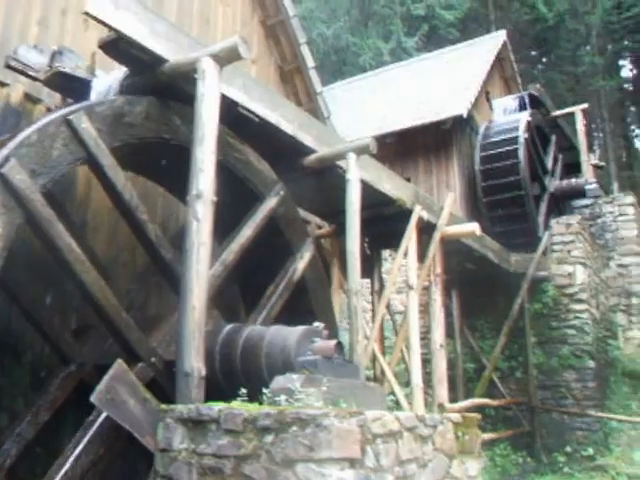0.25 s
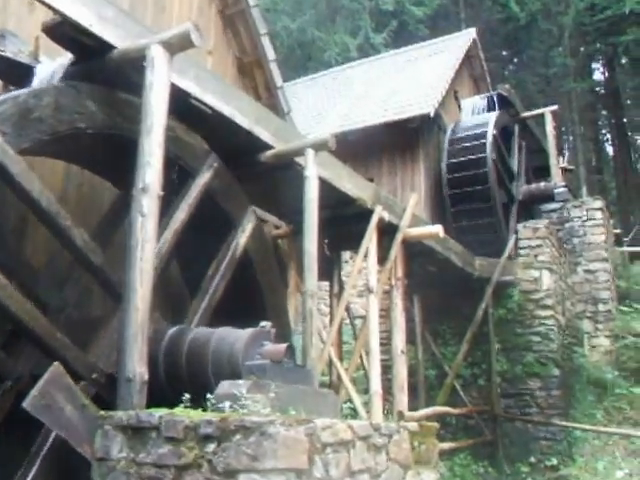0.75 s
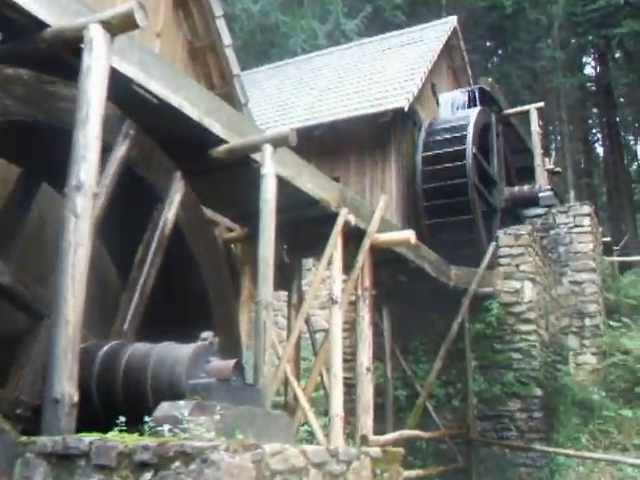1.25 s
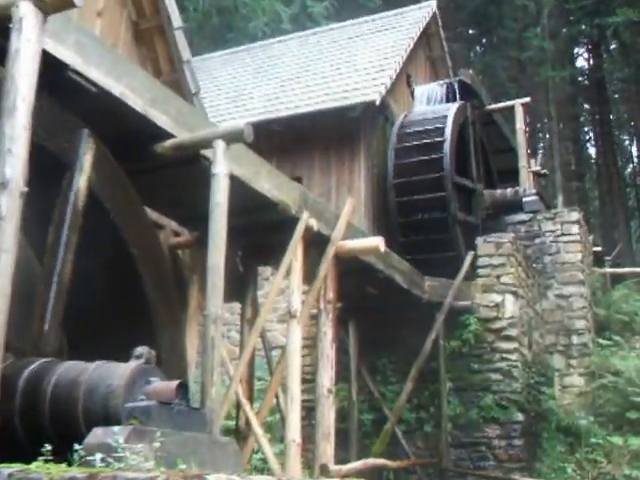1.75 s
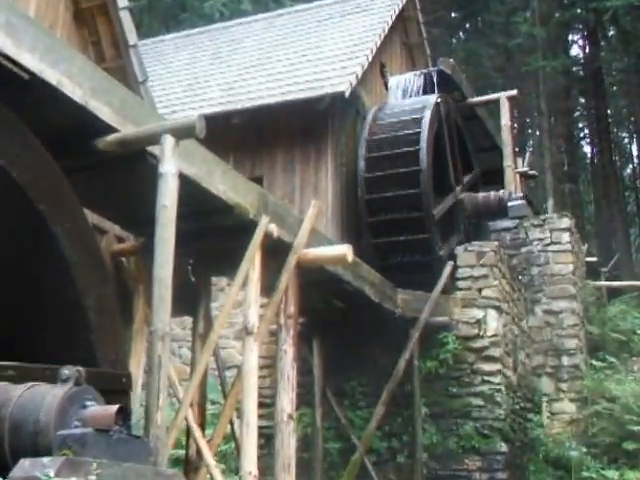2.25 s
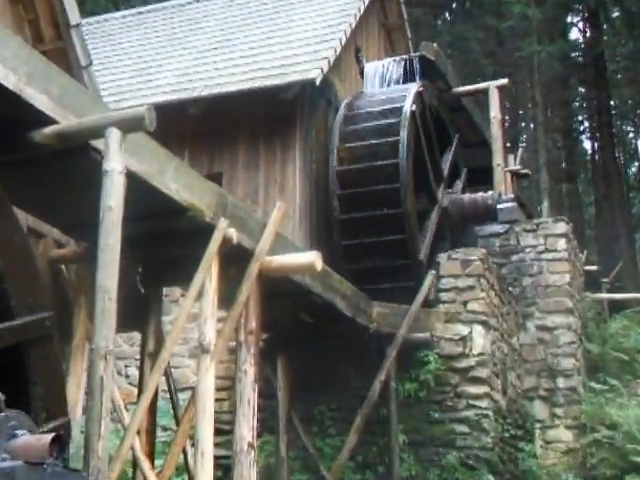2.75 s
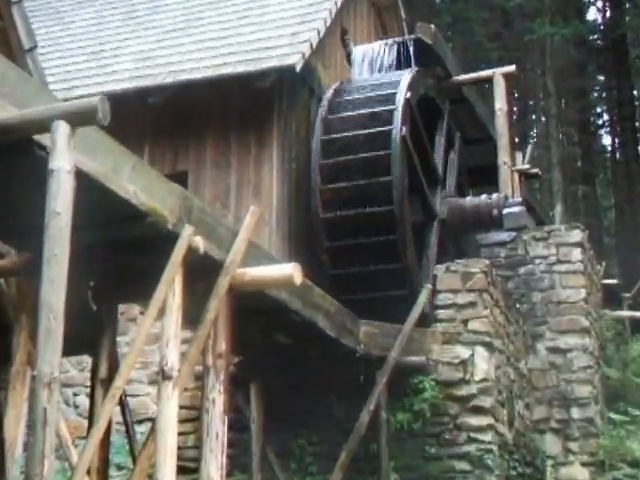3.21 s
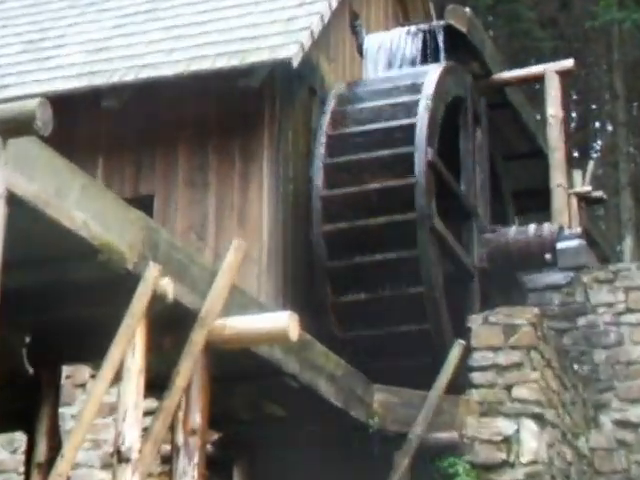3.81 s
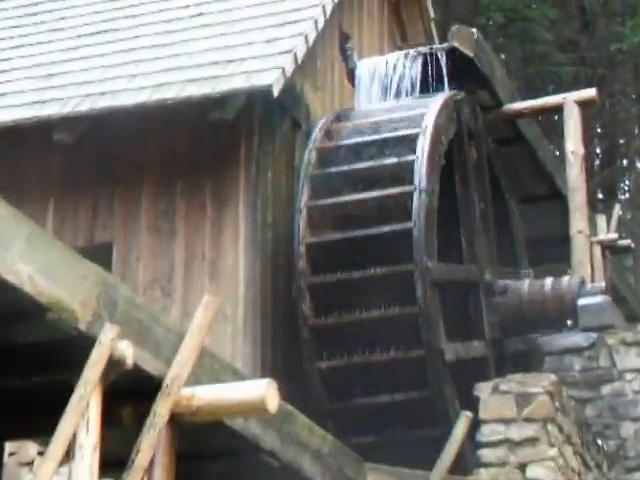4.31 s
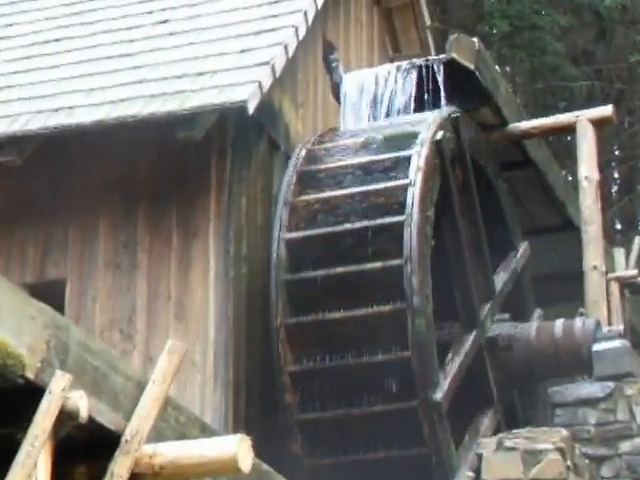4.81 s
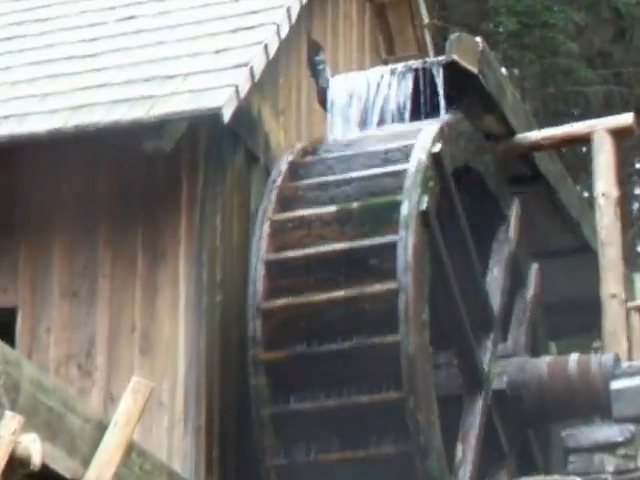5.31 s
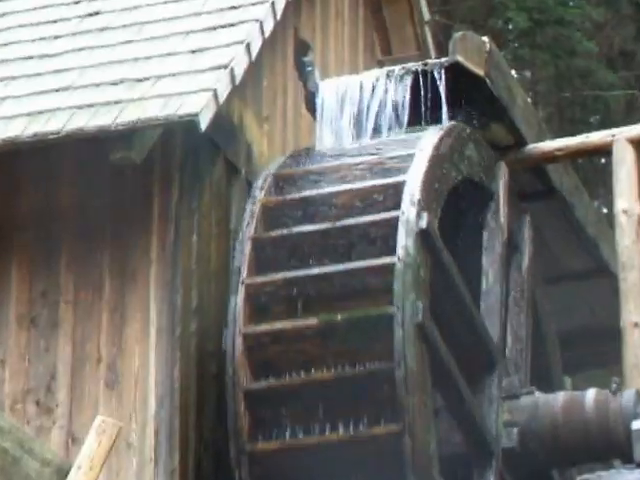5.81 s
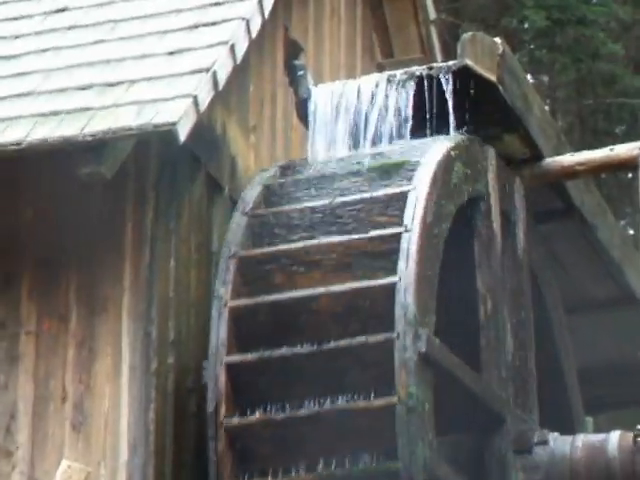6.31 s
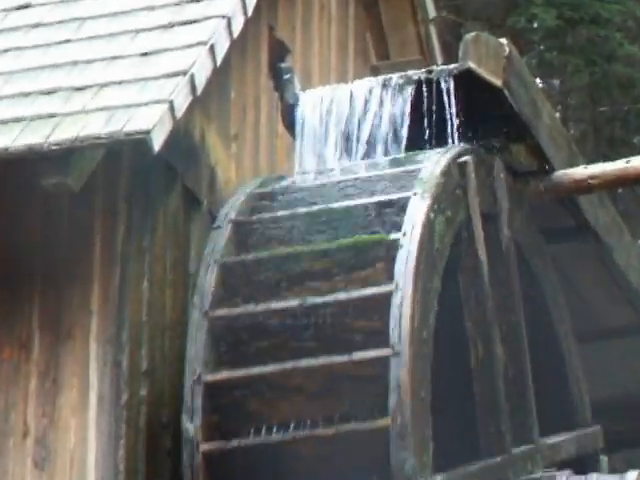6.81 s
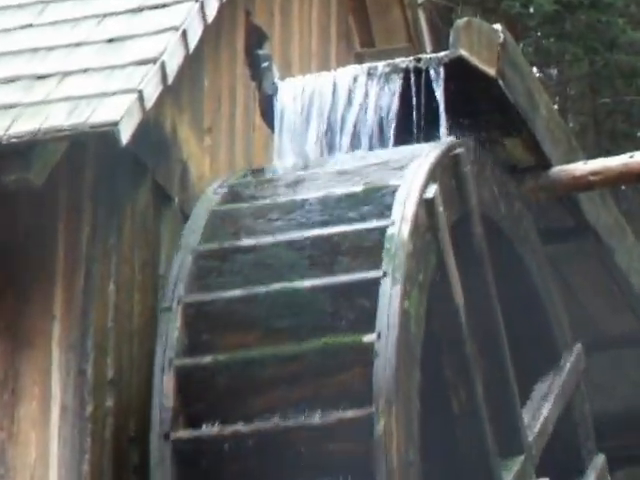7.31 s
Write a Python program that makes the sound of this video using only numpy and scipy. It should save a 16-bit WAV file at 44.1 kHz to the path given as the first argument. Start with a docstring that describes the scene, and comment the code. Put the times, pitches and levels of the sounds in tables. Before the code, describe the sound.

At an outdoor mill, falling water splashes continuously over a wooden wheel, pulsing about four times a second with churning and occasional plops underneath. Wooden stamps soon join in, dropping and bouncing with short rattling knocks that boom lightly through the timber frame. Water and knocking carry on together to the end, heard in mono through a camera microphone with a soft top and light low end.

```python
"""Water pours from a flume onto a turning wooden wheel. From the start a bright spray hisses over a
duller churn and a low gurgle, swelling as the buckets pass, and a few big bubbles plop.
From about 2 s wooden mill stamps drop and chatter behind the wall, booming in the frame: three stamps
take over from one another while the water runs on to the end.
All is heard through a mono camera microphone with little bass and a soft treble edge."""
import sys
import numpy as np
from scipy import signal
from scipy.fft import rfft, irfft, next_fast_len
from scipy.io import wavfile
from scipy.ndimage import uniform_filter1d, map_coordinates

SR = 44100
rng = np.random.default_rng(int(sys.argv[2]) if len(sys.argv) > 2 else 0)


def wav_out(sig):
    """Save sig, one row per channel (or a flat mono array), as 16-bit PCM at SR to the path in sys.argv[1]."""
    wavfile.write(sys.argv[1], SR, np.round(np.clip(np.atleast_2d(sig).T, -1, 1) * 32767).astype(np.int16))


N = 332955


def amp(db):
    """Gain of a level in dB."""
    return 10 ** (np.asarray(db) / 20)


def unit(x):
    """x at rms 1."""
    return x / np.sqrt(np.mean(x ** 2) + 1e-20)


def along(points, hz):
    """Read a curve of (Hz, value) points on a log frequency axis."""
    f, v = np.transpose(points)
    return np.interp(np.log(hz + 1), np.log(f + 1), v)


def filtered(x, response):
    """x through an EQ whose gain is a function of frequency."""
    m = next_fast_len(len(x) + 8192)
    return irfft(rfft(x, m) * response(np.fft.rfftfreq(m, 1 / SR)), m)[:len(x)]


def coloured(x, spectrum):
    """x shaped by (Hz, dB) points, at rms 1."""
    return unit(filtered(x, lambda hz: amp(along(spectrum, hz))))


def wobble(rate):
    """A smooth random curve, rate knots a second."""
    return map_coordinates(rng.standard_normal(int(N * rate / SR) + 4), [np.arange(N) * rate / SR])


def patchy(depth_db):
    """White noise with patches of random gain across time and frequency."""
    z = signal.stft(rng.standard_normal(N), nperseg=512)[2]
    field = uniform_filter1d(rng.standard_normal(z.shape), size=6, axis=0)
    field = uniform_filter1d(field, size=8, axis=1)
    return signal.istft(z * amp(depth_db * unit(field)), nperseg=512)[1][:N]


def drops(count, hz, cycles, spread_db, rise):
    """Damped sines at random times, scattered around hz; a bubble's pitch rises as it dies."""
    starts = (rng.random((count, 1)) * N).astype(int)
    scatter = np.clip(rng.standard_normal((count, 2)), -2.5, 2.5)
    k = np.arange(400)
    turns = np.clip(hz * np.exp(0.338 * scatter[:, :1]), 300, 9000) * k / SR
    envelope = (1 - np.exp(-2 * turns)) * np.exp(-turns / cycles) * (1 - k / 400)
    tone = np.sin(2 * np.pi * turns * (1 + rise * turns / cycles))
    pings = amp(spread_db * scatter[:, 1:]) * envelope * tone
    return unit(np.bincount((starts + k).ravel(), pings.ravel(), N + 400)[:N])


# The water bed between swells. Each row: time in seconds, spray fader in dB, churn fader in dB.
WATER_FADERS = [(0, -27.5, -32.5), (.6, -28.5, -34.5), (1.0, -29, -36), (1.2, -31, -37), (1.7, -31, -35.5),
                (2.15, -30.5, -34.5), (2.3, -27.5, -36), (2.9, -29, -29), (3.3, -31.5, -37.5),
                (3.62, -32.5, -38.5), (3.95, -28, -34), (4.4, -30.5, -38), (4.9, -28, -35),
                (5.4, -31, -36.5), (5.7, -31.5, -39.5), (6.4, -33, -40), (7.0, -32, -40),
                (7.55, -32, -37.5)]


def water():
    """The pour on the wheel: spray and churn ride the swells and share one fast flutter."""
    times, *faders = np.transpose(WATER_FADERS)
    spray_db, churn_db = [np.interp(np.arange(N) / SR, times, fader) for fader in faders]
    fine_db, coarse_db = spray_db + hiss_swells()
    coarse_db -= 4  # the coarse spray sits under the fine
    flutter_db = 0.15 * wobble(25) + 0.96 * wobble(90)
    surge_db = 0.33 * (coarse_db - spray_db) + 0.54 * flutter_db
    return amp(flutter_db) * spray(fine_db, coarse_db) + churn(churn_db + surge_db) + gurgle(churn_db)


# The bright hiss of the spray. Each row: frequency in Hz, level in dB.
SPRAY_EQ = [(900, -18), (1800, -7), (2500, -4.5), (3500, -0.5), (5000, 0.5), (7000, 0), (11000, -10.5)]


def spray(fine_db, coarse_db):
    """Hiss with splatter and spit on it, split at 3800 Hz into coarse spray below and fine above."""
    splatter = drops(count=9000, hz=5800, cycles=1.5, spread_db=3.8, rise=.1)
    spit = drops(count=1500, hz=8500, cycles=3, spread_db=5, rise=.05)
    hiss = coloured(patchy(depth_db=1.1), SPRAY_EQ)
    full = hiss + amp(-7.5) * splatter + amp(-16) * spit
    coarse = filtered(full, lambda hz: 1 / (1 + (hz / 3800) ** 6))
    return amp(fine_db) * unit(full - coarse) + amp(coarse_db) * unit(coarse)


# The midrange body of the churn. Each row: frequency in Hz, level in dB.
CHURN_EQ = [(250, -24), (400, -6), (550, -4), (700, -1.5), (1000, -1), (2500, -1), (3300, -16.5),
            (5500, -120)]


def churn(level_db):
    """Churning water: a dull, wavering wash with small bubbles in it."""
    bubbles = drops(count=900, hz=1200, cycles=4, spread_db=4.5, rise=.15)
    gain = amp(level_db + 0.77 * wobble(6.3))
    wash = coloured(patchy(depth_db=1.5), CHURN_EQ)
    return gain * (wash + amp(-13.5) * bubbles)


# The hollow low end of the gurgle. Each row: frequency in Hz, level in dB.
GURGLE_EQ = [(20, -8), (60, -20), (120, -26.5), (170, -4), (225, -3.5), (290, -8.5), (400, -3),
             (500, -11.5), (900, -99)]


def gurgle(churn_db):
    """The hollow under the wheel: lumpy low noise that follows about half of the churn's slow swings."""
    level_db = -48.5 + 0.49 * (churn_db - churn_db.mean())
    lumps_db = 1.8 * wobble(10)
    return amp(level_db + lumps_db) * coloured(rng.standard_normal(N), GURGLE_EQ)


# Swells of bright hiss: mostly passing buckets, one (3.1 s) with the crack of a stamp blow.
# Each row: time in seconds, fine spray swell in dB, coarse spray swell in dB, release in seconds.
HISS_SWELLS = [(.13, 0, 0.5, 0.015), (.245, 3, 1, 0.027), (.495, 3.5, 0.5, 0.11), (0.802, 1.5, 2, 0.1),
               (1.07, 2.5, 3, 0.025), (1.27, 2.5, 1, 0.07), (1.505, 7, 2, 0.025), (1.74, 2, -2, 0.022),
               (1.891, 3.5, 4.5, 0.054), (2.31, 1, 7.5, 0.048), (2.475, 3.5, 2, 0.036),
               (2.625, 6, 7, 0.022), (2.815, -0.5, 0.5, 0.033), (2.94, 5, 3.5, .03), (3.10, 4.5, -1, 0.059),
               (3.255, 8, 11, 0.026), (3.42, 3, -0.5, 0.019), (3.527, 8, 9, 0.046), (3.823, 7, 6.5, 0.033),
               (4.08, 7, 5, 0.026), (4.336, 8, 6, 0.032), (4.585, 8.5, 7, 0.028), (4.802, 5.5, 7, 0.07),
               (5.052, 5, 3, 0.047), (5.28, 8, 2.5, 0.033), (5.547, 9, 7, 0.027), (5.798, 9, 7.5, 0.012),
               (6.035, 6.5, 6.5, .04), (6.283, 7.5, 5.5, 0.021), (6.553, 10, 9.5, 0.024),
               (6.815, 8.5, 4.5, 0.031), (7.082, 8, 4, 0.037), (7.31, 0, 0, .03), (7.42, 4, 2, 0.023)]
ATTACK_S, ROUNDNESS = 0.064, 1.09  # the swell's rise and shape: 1 is pointed, 2 is round
HOLLOW_DB, HOLLOW_S = -1, 0.071  # a thin moment after each swell
LEAD_S = 0.0096  # the coarse spray peaks first, so each swell sweeps upward


def hiss_swells():
    """Fine and coarse spray build, drop and thin out, mostly as a rim cuts the water. Two dB curves."""
    hop = 32
    peak_s, fine_db, coarse_db, release_s = np.transpose(HISS_SWELLS)[..., None]
    t = np.arange(0, N, hop) / SR - peak_s
    swell = lambda t: np.exp(-(np.abs(t) / np.where(t < 0, ATTACK_S, release_s)) ** ROUNDNESS)
    hollow_db = HOLLOW_DB * np.exp(-2 * ((t - release_s) / HOLLOW_S - 1) ** 2)
    layers = [fine_db * swell(t) + hollow_db, coarse_db * swell(t + LEAD_S) + hollow_db]
    return np.repeat(np.sum(layers, axis=1), hop, axis=1)[:, :N]


# The big bubbles. Each row: start in seconds, level in dB, starting pitch in Hz.
BIG_BUBBLES = [(.338, -19, 695), (.59, -24, 750), (.825, -21, 970), (1.535, -20, 1000), (1.595, -21, 860),
               (1.875, -31, 1030), (1.98, -19, 1040), (2.069, -22, 1020), (6.02, -17, 2270),
               (6.289, -24, 1350)]


def plops():
    """Single large bubbles ring with a soft attack and a rising pitch."""
    out, t = np.zeros(N + SR), np.arange(SR // 10) / SR
    for start, db, hz in BIG_BUBBLES:
        envelope = amp(db - 60 * t / 0.055) * (1 - np.exp(-t / 0.0078))
        out[round(start * SR):][:len(t)] += envelope * np.sin(2 * np.pi * hz * t * (1 + 1.4 * t))
    return out[:N]


# Stamp blows and their bounces. Each row: start in seconds, level in dB, ring of the struck timber in Hz,
# then boom, beam and crack in dB against the timber band, and which stamp falls.
STAMP_BLOWS = [(1.8887, -39.5, 1430, -10, 1, 11, "a"), (2.0485, -36, 2130, -8, -4, -4, "a"),
               (2.2414, -29, 1230, -10.5, -8, -8, "a"), (2.2881, -31, 1750, -26, -18, 4, "a"),
               (2.318, -39, 1850, -26, -26, -10, "a"), (2.4258, -25, 1190, -19, -10, -8.5, "a"),
               (2.4792, -28.5, 1240, -14, -11, -11, "a"), (2.6295, -21, 1460, -24, -9, -5, "a"),
               (2.6758, -25, 1186, -17, -14, -24, "a"), (2.805, -22.5, 1356, -21, -8.5, -6, "a"),
               (2.837, -26, 1460, -9.5, -5, -11.5, "a"), (2.8692, -24, 2120, -33, -3, -9.5, "a"),
               (2.9098, -26.5, 1630, -10, -1.5, -25, "a"), (2.9388, -39, 1530, -18, -3, 7, "a"),
               (3.0848, -22, 1534, -11.5, -6, -4, "a"), (3.1194, -42, 1540, 1, -1, -4, "a"),
               (3.255, -22.5, 1435, -22, -5, -6, "a"), (3.2939, -24.5, 1610, -10.5, -2, -11, "a"),
               (3.3493, -29.5, 2090, -13, -3, -4.5, "a"), (3.584, -25.5, 1310, -13, -5, -6, "a"),
               (3.7416, -30, 2190, -10, -5, -1, "a"), (3.8784, -30.5, 1980, -9, -11, -11, "a"),
               (4.2989, -33.5, 1370, -12, -17, 1, "b"), (4.7155, -20, 1570, -13, -1, -4, "b"),
               (4.8843, -20, 1260, -10, -4, -5.5, "b"), (4.9237, -22.5, 1530, -11, 0.5, -5, "b"),
               (4.9646, -20, 1660, -15, -8.5, -9.5, "b"), (5.265, -19, 2080, -15, -7, -6, "b"),
               (5.3063, -25.5, 1440, -9, 1, -4, "b"), (5.3266, -24.5, 1340, -11, -5, -9, "b"),
               (5.3494, -26.5, 1630, -7, 1, -11, "b"), (5.3794, -22, 1320, -6, -7, -4, "b"),
               (5.4046, -28.5, 1380, -11, 4, -11, "b"), (5.798, -22, 2250, -10, -3, -7, "b"),
               (5.8427, -24, 1506, -8.5, -2, -4, "b"), (6.1372, -24, 2005, -8, -3, -2.5, "b"),
               (6.5542, -29, 1550, -14, -2.5, -8, "c"), (6.9099, -20.5, 1440, -21, -5, -3, "c"),
               (7.183, -21, 1800, -22, -8, -0.5, "c"), (7.2363, -20, 1740, -18, -16, 0, "c"),
               (7.2882, -21.5, 1706, -20, -12, -4.5, "c"), (7.4709, -20.5, 1460, -30, -9.5, 2, "c"),
               (7.5108, -19, 1574, -19, -12, -4.5, "c"), (7.5444, -25, 1590, -24, -12, -4, "c")]
# Each stamp shakes the frame its own way. Each entry: beam ring in Hz, plank EQ in dB, post EQ in dB.
STAMP_VOICES = {"a": (650, -2.4, -1.2), "b": (663, -7, -4), "c": (777, 0.5, -2)}
# The EQ bands of a blow, in Hz: boom, plank, beam, post, timber, crack.
BLOW_BANDS_HZ = [95, 230, 680, 1100, 1550, 3000]
FIRM_DB, PLANK_DB_PER_DB = -27.5, 0.42  # a usual blow; softer ones gain plank and sound duller


def stamps():
    """Wooden stamps drop and bounce: each blow rings the frame and sets off a rattle."""
    out, t = np.zeros(N + SR), np.arange(SR // 3) / SR
    for start, db, timber_hz, boom_db, beam_db, crack_db, stamp in STAMP_BLOWS:
        beam_hz, plank_db, post_db = STAMP_VOICES[stamp]
        plank_db += PLANK_DB_PER_DB * (FIRM_DB - db)
        blow_eq = list(zip(BLOW_BANDS_HZ, [boom_db, plank_db, beam_db, post_db, 0, crack_db]))
        blow = frame_ring(t, timber_hz, beam_hz, blow_eq) + rattle(t, blow_eq)
        out[round(start * SR):][:len(t)] += amp(db) * blow
    return out[:N]


# The resonances of the mill frame. Each row: pitch in Hz, level in dB, seconds to fade by 60 dB.
FRAME_MODES = [(77, 3.5, 0.11), (99.7, -0.5, 0.33), (139.3, -2, 0.26), (164, 2.5, 0.12),
               (215.6, 2.5, 0.098), (378, -6, 0.13), (481.5, -3.5, 0.13), (911.5, -2.5, 0.15),
               (1106, 5, 0.029), (1347, -10, 0.045), (1450, -38, 0.051), (1636, -8.5, 0.075),
               (2220, -0.5, .045), (2845, 3.5, 0.047), (3157, 0, 0.039), (3600, -1, 0.03), (4100, 3, 0.03),
               (4500, -15, .04)]


def frame_ring(t, timber_hz, beam_hz, blow_eq):
    """A short chatter of contacts rings the frame's upper modes; the low ones boom just once."""
    struck = [(timber_hz, 3, .065), (beam_hz * (1 + .035 * rng.standard_normal()), 5, .085)]
    # joined timbers split every mode into a close, beating trio
    hz, db, t60 = np.repeat(FRAME_MODES + struck, 3, axis=0).T[..., None]
    hz = hz * (np.resize([.96, 1, 1.035], hz.shape) + rng.normal(0, .015, hz.shape))
    db = db + along(blow_eq, hz) + rng.normal(0, 1.8, hz.shape)
    attack = 1 - np.exp(-t * hz / 1.44)  # heavy timbers take a cycle or so to start swinging
    modes = amp(db - 60 * t / t60) * attack * np.sin(2 * np.pi * hz * t) / np.sqrt(3)
    early = t[:1200]
    chatter = rng.standard_normal(len(early)) ** 3 * amp(-60 * early / 0.084)
    chatter[0] = 0.57 * np.linalg.norm(chatter)  # a firm first contact
    upper = hz[:, 0] > 300
    clatter = signal.fftconvolve(modes[upper].sum(0), chatter / np.linalg.norm(chatter))[:len(t)]
    return clatter + modes[~upper].sum(0)


# The noisy edge of a blow. Each row: frequency in Hz, level in dB.
RATTLE_EQ = [(60, -68), (300, -2), (1000, 0), (2500, -0.5), (5000, -2), (10000, -12)]


def rattle(t, blow_eq):
    """The noise of wood hitting wood: a quick crack over a slower dying rattle."""
    noise = filtered(rng.standard_normal(len(t)), lambda hz: amp(along(RATTLE_EQ, hz) + along(blow_eq, hz)))
    attack = 1 - np.exp(-t / .002)
    decay = amp(3.5 - 60 * t / 0.026) + amp(6 - 60 * t / 0.073)
    return attack * decay * unit(noise)


def yard(x, t60):
    """The walls and trees send back a short blurred tail."""
    t = np.arange(SR // 2) / SR
    tail = rng.standard_normal(len(t)) * amp(-60 * t / t60) * (t > .012)
    return signal.fftconvolve(x, tail / np.linalg.norm(tail))[:N]


def scene():
    """Dry water and stamps with a touch of yard, the same on both channels."""
    knocks = stamps()
    mix = water() + plops() + knocks + amp(-5) * yard(knocks, t60=0.2)
    return np.tile(mix, (2, 1))


# The microphone's tone. Each row: frequency in Hz, gain in dB.
MIC_EQ = [(20, -5), (80, -0.5), (7000, 1), (8000, -1.5), (9000, -9), (9700, -22), (10300, -35.5)]
TOP_HZ, DC_OFFSET = 10290, -.0033


def record(dry):
    """The microphone's colour, nothing above the band limit; the converter sits slightly off zero."""
    response = lambda hz: amp(along(MIC_EQ, hz)) * (hz < TOP_HZ)
    return np.array([filtered(channel, response) for channel in dry]) + DC_OFFSET


dry = scene()
out = record(dry)
wav_out(out)
```